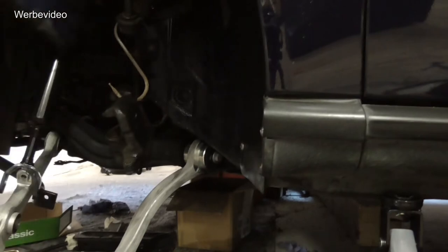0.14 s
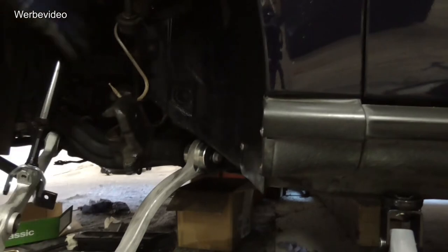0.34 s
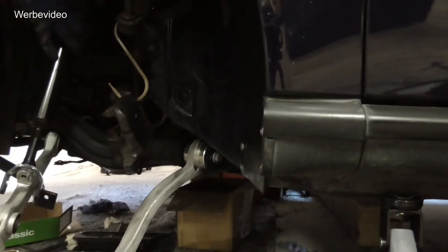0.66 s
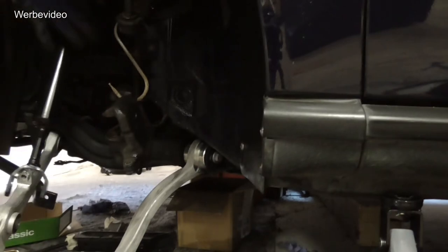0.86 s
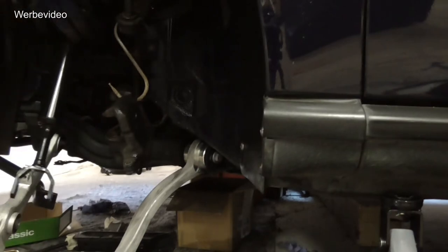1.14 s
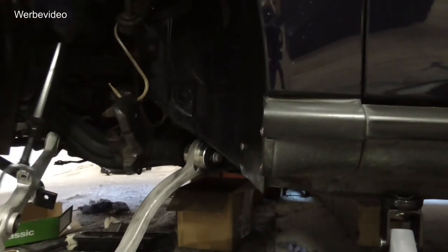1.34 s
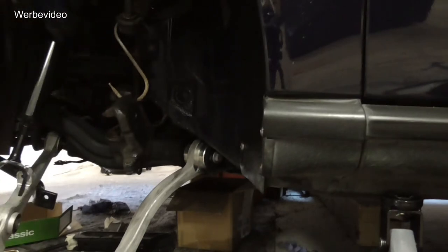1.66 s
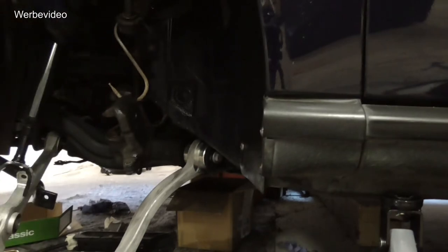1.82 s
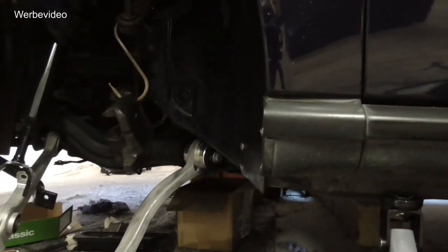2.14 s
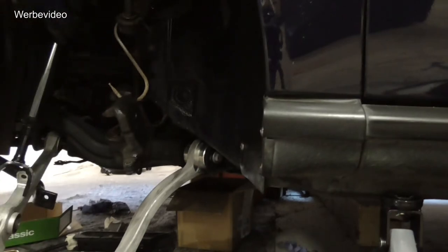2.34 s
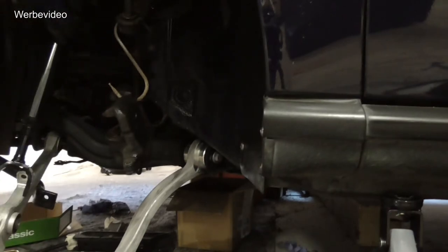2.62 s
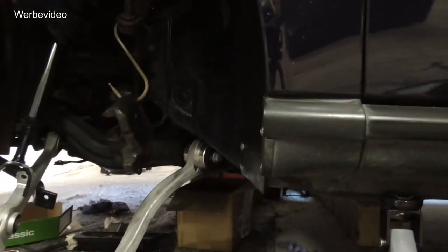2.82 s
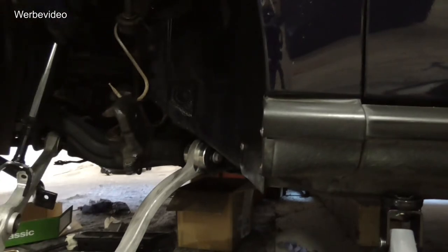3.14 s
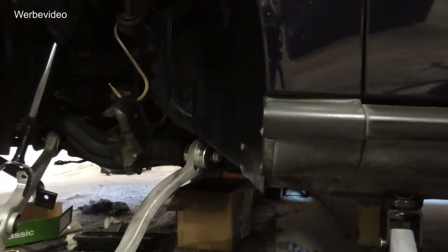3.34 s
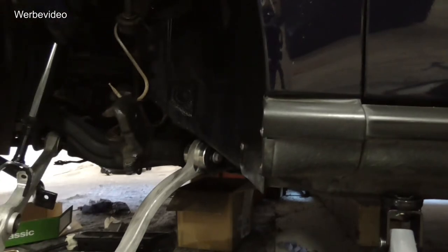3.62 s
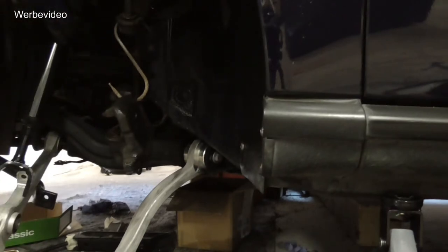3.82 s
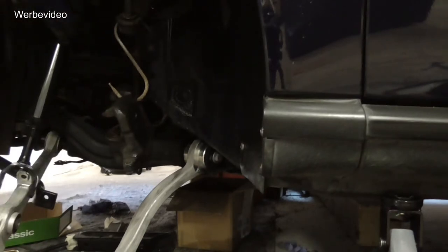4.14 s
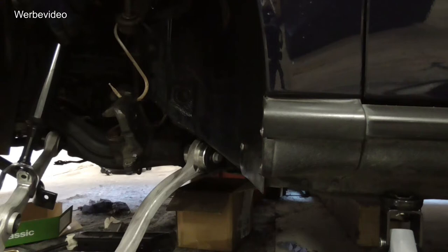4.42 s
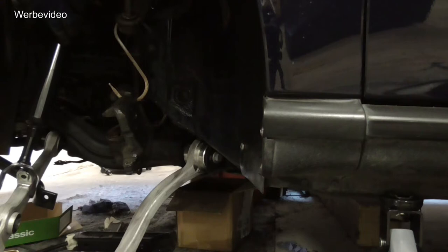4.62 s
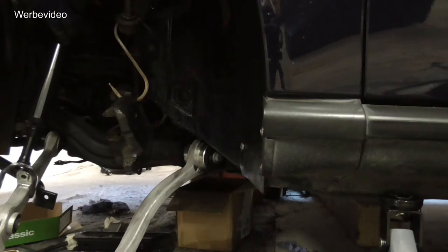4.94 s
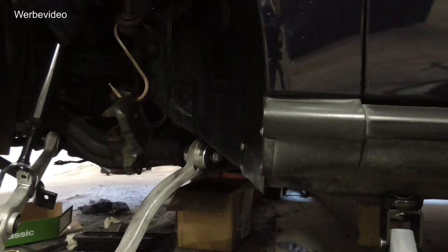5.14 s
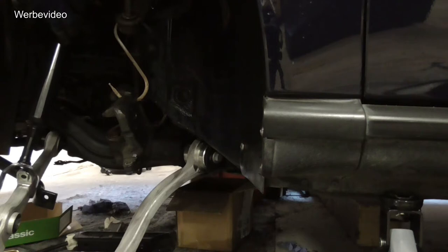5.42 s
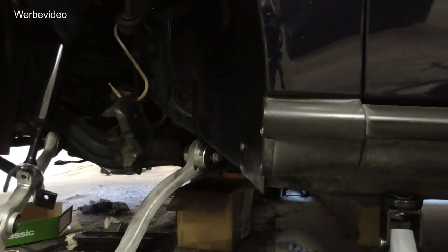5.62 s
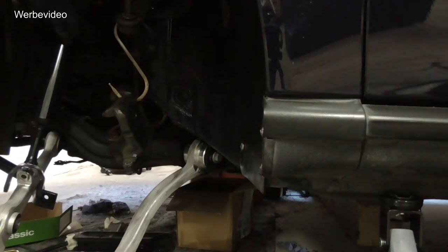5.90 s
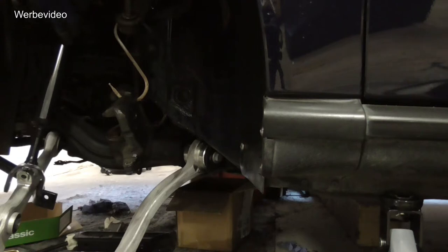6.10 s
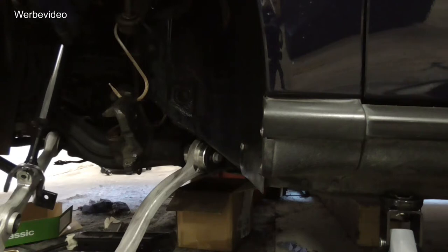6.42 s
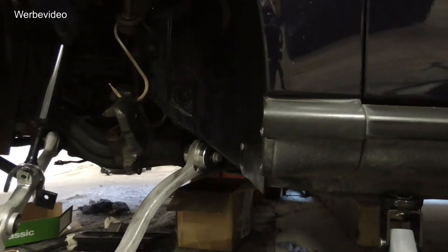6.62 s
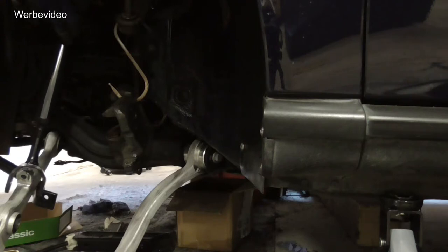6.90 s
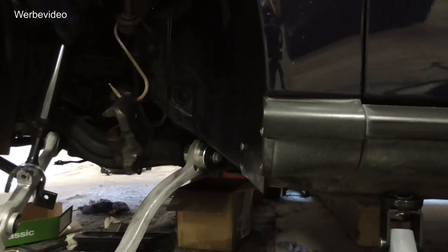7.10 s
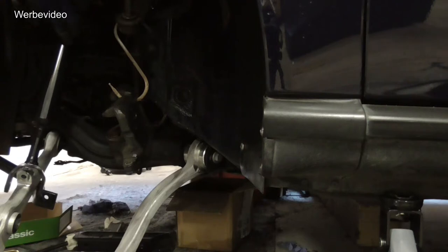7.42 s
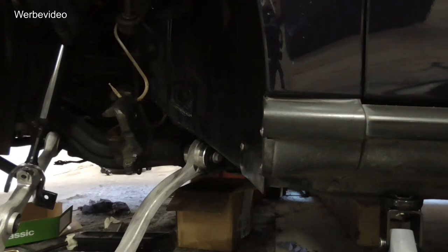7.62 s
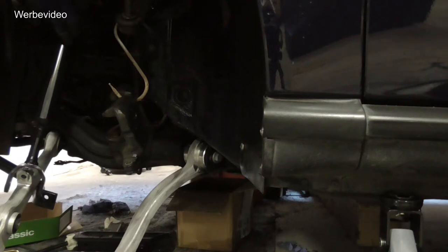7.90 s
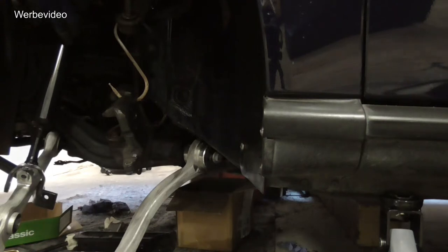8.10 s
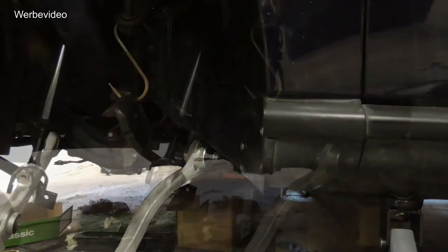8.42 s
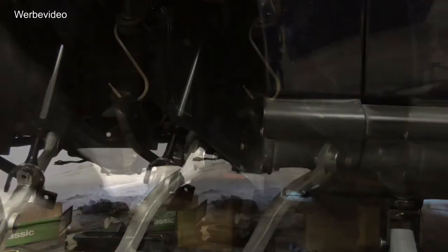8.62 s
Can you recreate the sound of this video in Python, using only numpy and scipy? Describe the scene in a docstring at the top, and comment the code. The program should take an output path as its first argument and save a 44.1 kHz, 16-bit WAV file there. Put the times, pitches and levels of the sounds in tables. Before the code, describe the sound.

Someone works on a car's suspension in a slightly echoing garage. Soft knocks build to a cluster of dull, heavy thuds, then a steel wrench and socket snap, clink and slide on a bolt. Most clacks are short and damped by the hand, though a few leave a thin high ring. Another thud and lighter clicks follow. Sleeves swish near the microphone over faint steady room noise.

```python
"""Dull knocks and rustling sleeves, then steel clacks, clinks and slides: a wrench and socket being
fitted to a bolt on a car's suspension in a garage. The heavy arm thuds against the body and hums on.
The hand damps the tools to short clacks; let go for a moment, they ring. Sliding steel catches and
slips. The work echoes in the room, the sleeves are close, and a faint steady noise lies beneath."""
import sys
import numpy as np
from scipy import signal
from scipy.fft import rfft, irfft
from scipy.io import wavfile
from scipy.ndimage import uniform_filter1d

SR = 44100
rng = np.random.default_rng(int(sys.argv[2]) if len(sys.argv) > 2 else 0)


def dump(signal):
    """Clip the signal to [-1, 1] and save it as 16-bit WAV at the path in sys.argv[1]."""
    limited = np.clip(np.atleast_2d(signal).T, -1, 1)
    pcm = np.round(limited * 32767).astype(np.int16)
    wavfile.write(sys.argv[1], SR, pcm)


N = 385875
TIME_S = np.arange(N) / SR
BIN_HZ = np.maximum(np.fft.rfftfreq(N, 1 / SR), 1)
PIVOT_HZ = 2000   # reference for tilt and damping
CONTACT_RISE_S, STEEL_SCATTER_DB = .0008, 2.5


def from_db(db):
    return 10 ** (np.asarray(db) / 20)


def unit_rms(x):
    return x / np.sqrt(np.mean(x ** 2) + 1e-20)


def at_hz(points, hz):
    """Table value on a log-frequency axis."""
    freq_hz, value = np.transpose(points)
    return np.interp(np.log(hz), np.log(freq_hz), value)


def band_centres(edges_hz):
    return np.sqrt(np.multiply(edges_hz[:-1], edges_hz[1:]))


def band_of(edges_hz, hz):
    return int(np.searchsorted(edges_hz[1:-1], hz))


def butterworth(x, kind, cutoff_hz, order=2):
    return signal.sosfilt(signal.butter(order, cutoff_hz, kind, fs=SR, output="sos"), x)


def swell(peak_s, half_s, level_db):
    return from_db(level_db) * np.exp(-((TIME_S - peak_s) / half_s) ** 2)


def smooth_noise(window_samples):
    return unit_rms(uniform_filter1d(rng.standard_normal(N), size=window_samples))


# left-right likeness: freq_hz, correlation
LIKENESS = [(100, 0.96), (500, 0.8), (1100, 0.55), (2500, 0.72), (5000, 0.78), (9000, 0.26), (14000, 0.1)]
def stereo_noise(gain):
    """Unit-rms noise with a gain per bin; the channels are less alike in the treble."""
    alike = at_hz(LIKENESS, BIN_HZ)
    mid, side = rfft(rng.standard_normal((2, N)))
    spectrum = np.sqrt(1 + alike) * mid + np.sqrt(1 - alike) * side * [[1], [-1]]
    return unit_rms(irfft(gain * spectrum, N))


def coloured_noise(colour):
    return stereo_noise(from_db(at_hz(colour, BIN_HZ)))


def resonator(drive, hz, t60_s):
    """One mode: a unit click starts a decaying sine of height 1."""
    radius, angle = from_db(-60 / (t60_s * SR)), 2 * np.pi * hz / SR
    return signal.lfilter([0, np.sin(angle)], [1, -2 * radius * np.cos(angle), radius ** 2], drive)


def blow_envelope(t, rise_s, t60_s):
    return (1 - np.exp(-t / rise_s)) * from_db(-60 * t / t60_s)


def dense_modes(times_s, bands_db, edges_hz, colour, t60s_s, rise_s):
    """Modes too dense to tell apart: each blow starts a noise burst in every band."""
    starts, rises_s = (times_s * SR).astype(int), np.broadcast_to(rise_s, len(times_s))
    out = 0
    for low_hz, high_hz, levels_db, t60_s in zip(edges_hz, edges_hz[1:], bands_db, t60s_s):
        band = 1 / np.sqrt((1 + (low_hz / BIN_HZ) ** 12) * (1 + (BIN_HZ / high_hz) ** 12))
        t, power = TIME_S[:int(min(t60_s, 1) * SR)], np.zeros(N + SR)
        for start, height, rise in zip(starts, from_db(levels_db), rises_s):
            power[start:start + len(t)] += (height * blow_envelope(t, rise, t60_s)) ** 2
        out = out + np.sqrt(power[:N]) * stereo_noise(band * from_db(at_hz(colour, BIN_HZ)))
    return out


def clear_modes(modes, times_s, force_db_at, detune, scatter_db=STEEL_SCATTER_DB, rise_s=1 / SR):
    """Decaying sines; sign, strength and pitch scatter from blow to blow."""
    starts, rises_s = (times_s * SR).astype(int), np.broadcast_to(rise_s, len(times_s))
    out = np.zeros(N + SR)
    for hz, level_db, t60_s in modes:
        t = TIME_S[:int(min(t60_s, 1) * SR)]
        polarity, strength, shift = rng.standard_normal((len(times_s), 3)).T
        heights = np.sign(polarity) * from_db(force_db_at(hz) + level_db + scatter_db * strength)
        for start, height, pitch_hz, rise in zip(starts, heights, hz * (1 + detune * shift), rises_s):
            envelope = height * blow_envelope(t, rise, t60_s)
            out[start:start + len(t)] += envelope * np.sin(2 * np.pi * pitch_hz * t)
    return out[:N]


# room noise spectrum: freq_hz, gain_db
ROOM_COLOUR = [(15, -48), (25, -20), (82, -16), (145, -11), (223, -1), (263, -8.5), (463, -8.5),
               (607, -26.5), (1130, -15.5), (1230, -27), (2550, -32), (3430, -59.5), (5570, -51),
               (9570, -31), (16000, -37.5)]
def room_noise(level_db, whirr_hz, whirr_width_hz, whirr_db):
    """Steady noise with a faint narrow whirr."""
    whirr = stereo_noise(1 / (1 + ((BIN_HZ - whirr_hz) / whirr_width_hz) ** 2))
    return from_db(level_db) * coloured_noise(ROOM_COLOUR) + from_db(whirr_db) * whirr


# reverberation time: freq_hz, t60_s
GARAGE_DECAY = [(60, 2.0), (130, 0.5), (300, 0.48), (1000, 0.53), (2800, 0.52), (7000, 0.41), (14000, 0.27)]
# reverberation spectrum: freq_hz, gain_db
GARAGE_COLOUR = [(60, 0), (200, 1.5), (500, -2), (1000, -2), (2000, -3), (4500, -10.5), (8000, -11),
                 (14000, -11)]
def garage_echo(x, rise_s):
    """Diffuse reflections build quickly and die octave by octave, the bass last."""
    noise = rfft(stereo_noise(gain=1)[:, :SR])
    hz = np.maximum(np.fft.rfftfreq(SR, 1 / SR), 1)
    response = 0
    for centre_hz in 31.25 * 2. ** np.arange(10):
        share = np.maximum(1 - np.abs(np.log2(hz / centre_hz)), 0)
        octave = irfft(noise * share * from_db(at_hz(GARAGE_COLOUR, hz)), SR)
        decay = blow_envelope(TIME_S[:SR], rise_s, at_hz(GARAGE_DECAY, centre_hz))
        response = response + octave * decay / np.sqrt(np.sum(decay ** 2))
    return signal.fftconvolve(x.mean(axis=0)[None], response, axes=1)[:, :N]


# swells of a low hum: peak_s, half_length_s, level_db
HUM_SWELLS = [(2.354, 0.15, -54.5), (7.595, 0.057, -46.5), (7.797, 0.042, -51)]
def hum(pitch_hz, waver_hz):
    """A narrow low resonance swells and fades."""
    envelope = sum(swell(*row) for row in HUM_SWELLS)
    drift_cycles = np.cumsum(waver_hz * smooth_noise(900)) / SR
    return envelope * np.sqrt(2) * np.sin(2 * np.pi * (pitch_hz * TIME_S + drift_cycles))


# cloth swish spectrum: freq_hz, gain_db
SWISH_COLOUR = [(880, -9.5), (1500, -1.5), (1690, -17.5), (2140, -5.5), (2410, -14), (4500, -7.5),
                (5940, -11.5), (10300, -7), (13100, -15.5), (16000, -30)]
# cloth rubbing spectrum: freq_hz, gain_db
RUB_COLOUR = [(35, -41), (60, -12), (156, 5), (186, -4.5), (231, 3), (280, -10), (489, -4.5), (759, -7.5),
              (1060, -10.5), (2000, -33), (2600, -49), (4400, -120)]
# sleeve movements: peak_s, half_length_s, swish_db, rub_db
SLEEVE_MOVES = [(0, 0.097, -56.5, -72), (0.379, 0.2, -51, -48), (0.83, 0.062, -56, -71),
                (1.006, 0.19, -62, -67), (1.45, 0.13, -53, -44.5), (1.808, 0.063, -56, -58),
                (1.996, 0.15, -57.5, -61), (2.286, 0.088, -60.5, -55), (4.22, 0.09, -70, -51.5),
                (4.63, 0.13, -77, -67), (5.767, 0.2, -69.5, -60), (7.046, 0.1, -93, -55),
                (7.563, 0.066, -59.5, -60), (7.874, 0.11, -66, -56.5), (8.215, 0.07, -52, -56),
                (8.374, 0.059, -52, -52.5), (8.584, 0.098, -50, -84), (8.74, 0.08, -53.5, -38.5)]
def sleeves(rest_swish_db, rest_rub_db, grain, flutter_db):
    """Moving cloth gives a fine uneven swish and a low rubbing noise."""
    swish = from_db(rest_swish_db) + sum(swell(s, half_s, db) for s, half_s, db, _ in SLEEVE_MOVES)
    rub = from_db(rest_rub_db) + sum(swell(s, half_s, db) for s, half_s, _, db in SLEEVE_MOVES)
    fibres = unit_rms(np.exp(grain * smooth_noise(60)))
    folds = from_db(flutter_db * smooth_noise(1200))
    return swish * fibres * folds * coloured_noise(SWISH_COLOUR) + rub * coloured_noise(RUB_COLOUR)


# tick band: edge_hz
TICK_EDGES_HZ = [6500, 14500]
# ticks among the rustling: start_s, level_db
TICKS = [(0.921, -36), (2.392, -46), (8.403, -48), (8.412, -37.5), (8.55, -34.5)]
def ticks():
    """Very short, thin, dry ticks."""
    times_s, level_db = np.transpose(TICKS)
    return dense_modes(times_s, [level_db], TICK_EDGES_HZ, SWISH_COLOUR, [.015], CONTACT_RISE_S)


# dull blow spectrum: freq_hz, gain_db
THUD_COLOUR = [(80, -66), (130, 5.5), (330, 6), (550, 12), (750, 4), (950, -2.5), (1600, -7.5)]
# knock bands: edge_hz
KNOCK_EDGES_HZ = [80, 280, 750, 1600]
# modes of the knock, a faint low room boom, then the arm's tones: pitch_hz, gain_db, t60_s
KNOCK_MODES = [(54, -10, .8), (126, -6, .45), (152, -1, .28), (205, -1, .22), (237, -1, .25), (255, 1, .24),
               (324, 2, .17), (374, -4, .1), (422, -1, .22), (498, 2, .13), (541, 1, .14), (647, -4, .16),
               (714, -5, .16), (764, -7, .15), (937, 5, .11)]
# blows on the arm: start_s, level_db, register_hz, rise_s, note_db
KNOCKS = [(0.312, -41, 480, 0.00033, -41.5), (0.32, -43, 157, 0.007, -30.5), (0.404, -43, 543, 0.002, -43),
          (0.482, -34, 595, 0.00083, -54), (0.522, -54, 520, .003, -55), (0.794, -34, 292, 0.00082, -43),
          (0.822, -45, 192, 0.0026, -37), (0.976, -46, 160, .003, -45), (1.069, -43, 173, 0.0011, -40.5),
          (1.285, -40, 660, 0.0014, -48), (1.367, -28, 606, 0.0025, -46), (1.377, -24.5, 204, .003, -40),
          (1.435, -43, 484, .003, -44), (1.495, -15, 292, 0.00021, -29), (1.515, -22.5, 280, 0.0011, -23),
          (1.545, -36, 540, .002, -36), (1.565, -38, 232, 0.0025, -24.5), (1.602, -31.5, 656, 0.00052, -37),
          (1.696, -26.5, 255, .0003, -30.5), (1.746, -37, 251, 0.0028, -34), (1.785, -50, 694, .003, -40.5),
          (1.86, -44, 630, 0.0029, -42), (5.602, -25.5, 353, 0.0019, -24), (5.635, -44, 418.6, 0.0038, -21),
          (5.661, -35, 205.4, 0.0035, -28), (5.715, -42, 206, 0.0063, -32),
          (6.021, -33, 380, 0.00077, -34.5), (6.068, -37.5, 373, .004, -41),
          (8.686, -37.5, 302, 0.0008, -58)]
def suspension_knocks(off_register_db):
    """The heavy arm thuds; the spot struck decides which register speaks and hums on."""
    times_s, level_db, register_hz, rise_s, note_db = np.transpose(KNOCKS)
    bands_db = [level_db - off_register_db * np.log2(hz / register_hz) ** 2
                for hz in band_centres(KNOCK_EDGES_HZ)]
    thud = dense_modes(times_s, bands_db, KNOCK_EDGES_HZ, THUD_COLOUR, [.11, .09, .08], rise_s)
    modes = clear_modes(KNOCK_MODES, times_s, lambda hz: bands_db[band_of(KNOCK_EDGES_HZ, hz)],
                        detune=.0035, scatter_db=1, rise_s=rise_s)
    note_t60_s = .15
    notes = sum(clear_modes([(hz, db, note_t60_s)], np.array([s]), lambda _: 0, detune=0, rise_s=rise)
                for s, hz, rise, db in zip(times_s, register_hz, rise_s, note_db))
    knocks = from_db(3.5) * thud + from_db(-5.5) * modes + notes
    return butterworth(knocks, "band", [120, 1400])   # keeps the thud dull, without click or deep rumble


# tool modes under the hand: pitch_hz, gain_db, t60_s
GRIPPED_MODES = [(865, 2, .05), (935, 2, .06), (1380, -4, .04), (2100, -12, .035), (2570, -9, .028),
                 (3060, -11, .028), (3420, -9, .022), (3830, -8, .028), (4420, -2, .018), (4680, -4, .014),
                 (5260, -9, .016), (10050, -6, .022)]
# socket modes: pitch_hz, gain_db, t60_s
SOCKET_MODES = [(12440, -12, .1), (12840, -4, .17), (12905, -3, .2), (12940, -2, .22), (12975, -5, .2),
                (13120, -6, .13), (13370, -13, .12)]
# sliding steel spectrum: freq_hz, gain_db
SCRAPE_COLOUR = [(50, -27), (150, -10), (300, 9), (800, 9), (1300, -10), (2000, 0.5), (3300, -8),
                 (4100, -0.5), (4500, 7), (4850, -1), (5250, 0.5), (5800, -4.5), (10000, -4), (11500, -15),
                 (13000, -11), (16000, -39)]
# steel sliding on steel: start_s, length_s, level_db
SLIDES = [(4.109, 0.075, -46), (4.141, 0.059, -43.5), (4.315, 0.03, -49), (4.506, 0.092, -50),
          (4.599, 0.092, -49.5), (4.778, 0.051, -53.5), (4.885, 0.048, -48.5), (5.238, 0.047, -53.5),
          (5.43, .03, -52.5), (5.84, 0.039, -43), (5.991, 0.059, -39), (6.851, 0.034, -49),
          (7.001, 0.026, -46), (8.449, 0.13, -50)]
def sliding_steel(slips_per_s, slip_t60_s, spread_db, squeal_db, shimmer_db):
    """Steel catches and slips; each slip is a tiny clack that stirs the tool and the socket."""
    pressure = np.zeros(N)
    for start_s, length_s, level_db in SLIDES:
        along = np.clip((TIME_S - start_s) / length_s, 0, 1)
        pressure += from_db(level_db) * np.sqrt(4 * along * (1 - along))
    slips = (rng.random(N) < slips_per_s / SR) * from_db(spread_db * rng.standard_normal(N))
    power_decay = from_db(-120 / (slip_t60_s * SR))
    slip_power = signal.lfilter([1], [1, -power_decay], slips ** 2 + 1e-18)
    scrape = unit_rms(np.sqrt(slip_power)) * coloured_noise(SCRAPE_COLOUR)
    squeal = unit_rms(sum(from_db(db) * resonator(slips, hz, t60) for hz, db, t60 in GRIPPED_MODES))
    shimmer = unit_rms(sum(from_db(db) * resonator(slips, hz, t60) for hz, db, t60 in SOCKET_MODES))
    return pressure * (scrape + from_db(squeal_db) * squeal + from_db(shimmer_db) * shimmer)


def favoured_modes(times_s, pitches_hz, levels_db, pivot_t60_s=.028, damping=.075):
    """The spot struck brings out one short mode; higher ones die sooner."""
    out = 0
    for start_s, hz, level_db in zip(times_s, pitches_hz, levels_db):
        click = np.full(N, 1e-18)
        click[round(start_s * SR)] = from_db(level_db)
        out = out + resonator(click, hz, pivot_t60_s * (PIVOT_HZ / hz) ** damping)
    return out


# steel tool spectrum: freq_hz, gain_db
STEEL_COLOUR = [(200, 2), (450, 10.5), (900, 7), (1250, 3), (1900, -3.5), (3000, -5), (3800, -0.5),
                (4600, -2), (5900, -12), (8800, -11.5), (10000, -14.5), (11500, -23.5), (13000, -21.5),
                (16000, -34)]
# free wrench modes: pitch_hz, gain_db, t60_s
WRENCH_MODES = [(1427, -3, .2), (2137, -6, .17), (3391, -14, .07), (3817, -9, .09), (8040, 1, .22),
                (8240, 2, .22), (8330, 2, .18), (10060, -8, .14)]
# socket sizzle band: edge_hz
SIZZLE_EDGES_HZ = [12200, 13800]
# hard contacts that leave a part ringing:
# start_s, snap_db, wrench_db, socket_db, sizzle_db, lower_hz, lower_db, upper_hz, upper_db
HARD_CONTACTS = [(2.723, -14.5, -74, -80, -75, 930, -25, 4490, -18),
                 (2.797, -12.5, -76, -82, -72, 2640, -36, 5030, -26),
                 (3.256, -52, -74, -50, -60, 5270, -35.5, 9900, -33),
                 (3.398, -30, -73, -52, -52, 4570, -16, 5170, -18),
                 (3.422, -39, -65, -52.5, -48, 4600, -16.5, 9800, -17.5),
                 (3.453, -13.5, -67.5, -30.5, -39, 4480, -27, 5180, -34),
                 (3.878, -33, -80, -72, -68, 3750, -42, 5350, -28),
                 (5.533, -40, -79, -63.5, -68, 3840, -19.5, 5130, -25.5),
                 (6.023, -35, -46, -66, -58, 2064, -21, 10000, -23.5),
                 (6.403, -41, -69, -47, -26, 1440, -28.5, 12900, -13.5),
                 (6.875, -57, -81, -85, -86, 910, -34, 3340, -33.5)]
def free_rings():
    """Let go for a moment, the wrench chimes and the small socket pings and sizzles."""
    (times_s, _, wrench_db, socket_db, sizzle_db,
     lower_hz, lower_db, upper_hz, upper_db) = np.transpose(HARD_CONTACTS)
    wrench = clear_modes(WRENCH_MODES, times_s, lambda _: wrench_db, detune=.0024)
    clash = favoured_modes(times_s, lower_hz, lower_db) + favoured_modes(times_s, upper_hz, upper_db)
    socket = clear_modes(SOCKET_MODES, times_s, lambda _: socket_db, detune=.00084)
    hiss = dense_modes(times_s, [sizzle_db], SIZZLE_EDGES_HZ, STEEL_COLOUR, [.2], CONTACT_RISE_S)
    sizzle = butterworth(hiss, "band", SIZZLE_EDGES_HZ)
    pan_right = from_db([[-1], [1]])
    return wrench + clash + (socket + sizzle) * pan_right


# snap band: edge_hz
SNAP_EDGES_HZ = [900, 16000]
# snap spectrum: freq_hz, gain_db
SNAP_COLOUR = [(900, -8), (5000, 13), (8000, -5.5), (16000, -13)]
def snaps(t60_s):
    """Hardened steel meeting squarely gives a brief bright crack."""
    times_s, snap_db = np.transpose(HARD_CONTACTS)[:2]
    return dense_modes(times_s, [snap_db], SNAP_EDGES_HZ, SNAP_COLOUR, [t60_s], CONTACT_RISE_S)


# spells of soft rattling: start_s, end_s, mean_db
RATTLES = [(3.079, 3.331, -43), (3.465, 3.62, -46), (3.664, 4.091, -50), (4.102, 4.42, -51.5),
           (4.529, 4.945, -51.5), (5.108, 5.5, -52.5), (6.906, 7.094, -62)]
def light_taps(gap_s, jitter_s, spread_db, tilt_db_per_octave, limit_hz):
    """The tools rattle as the fingers feel for the bolt; returns rows like CONTACTS."""
    taps = [(s, db) for start_s, end_s, db in RATTLES for s in np.arange(start_s, end_s, gap_s)]
    draws = rng.standard_normal((len(taps), 2))
    return [(s + jitter_s * late, db + spread_db * force, tilt_db_per_octave, limit_hz)
            for (s, db), (late, force) in zip(taps, draws)]


# clack bands: edge_hz
CLACK_EDGES_HZ = [130, 550, 1600, 6000, 11500, 16000]
# steel on steel; light parts tilt the spectrum up, heavy ones down, hard contacts keep more treble:
# start_s, level_db, tilt_db_per_octave, limit_hz
CONTACTS = [(1.438, -43.5, 7.5, 6100), (1.496, -35, 5, 5400), (1.631, -53.5, 6.5, 15300),
            (1.697, -46, 9.5, 2980), (1.861, -48, -2, 11800), (2.719, -22.5, 6, 1900),
            (2.723, -22, 4, 4660), (2.797, -24, 3.5, 5640), (3.076, -43, 3.5, 2490),
            (3.171, -23, 7.5, 2500), (3.256, -38, 0.5, 10000), (3.383, -30.5, 6, 7600),
            (3.397, -29.5, 6, 7900), (3.413, -28.5, 1.5, 6100), (3.423, -30.5, 9, 7400),
            (3.452, -28.5, 1, 16000), (3.678, -40, 3.5, 1700), (3.713, -38, 5.5, 1600),
            (3.789, -42.5, -0.5, 7240), (3.873, -44.5, 3.5, 7000), (3.876, -40, 2.5, 8000),
            (4.041, -54.5, 2.5, 11920), (4.249, -36, 4.5, 1407), (4.263, -37.5, 5, 1510),
            (4.321, -43, -2, 4130), (4.518, -41.5, 1, 5200), (4.557, -42.5, -1, 5430),
            (4.593, -37, 3, 3800), (4.607, -33.5, 4, 6340), (4.636, -44.5, -2.5, 11000),
            (4.781, -56.5, -3.5, 5000), (4.839, -49.5, -2.5, 1692), (4.891, -57, -5.5, 15900),
            (4.907, -55, -4.5, 5000), (5.511, -45.5, 0, 2800), (5.534, -30.5, 5.5, 7300),
            (5.834, -48, -2.5, 9000), (5.862, -37, -1, 7500), (6.013, -31, 7.5, 6200),
            (6.023, -26.5, 5, 6800), (6.374, -41.5, -2, 20200), (6.403, -29.5, 2, 20000),
            (6.823, -49, -0.5, 2340), (6.864, -40, -0.5, 8000), (6.874, -34, 2, 4300),
            (7.008, -36.5, -1, 7060), (7.022, -57, 6, 12000), (7.046, -48.5, 0, 11800),
            (7.078, -56, 3, 9000), (7.319, -42, 1.5, 2500), (7.336, -42.5, 4.5, 2820),
            (7.356, -45, -2, 4200), (7.378, -52.5, 0, 3200), (8.192, -38, 2, 7200)]
def tool_contacts(loose_from_s, loose_until_s, ping_db):
    """The hand damps the steel to short clacks and tones; the socket pings while it sits loose."""
    taps = light_taps(gap_s=.036, jitter_s=.011, spread_db=2.5, tilt_db_per_octave=2, limit_hz=1500)
    times_s, level_db, tilt_db_per_octave, limit_hz = np.transpose(list(CONTACTS) + taps)
    bands_db = []
    for hz in band_centres(CLACK_EDGES_HZ):
        treble_loss_db = 20 * np.log10(1 + (hz / limit_hz) ** 4)
        bands_db.append(level_db + tilt_db_per_octave * np.log2(hz / PIVOT_HZ) - treble_loss_db)
    clacks = dense_modes(times_s, bands_db, CLACK_EDGES_HZ, STEEL_COLOUR,
                         t60s_s=[.071, .12, .043, .055, .042], rise_s=.0014)   # chatter slows the rise
    tones = clear_modes(GRIPPED_MODES, times_s, lambda hz: bands_db[band_of(CLACK_EDGES_HZ, hz)],
                        detune=.015)
    loose_s = np.array([s for s, *_ in CONTACTS if loose_from_s < s < loose_until_s])
    pings = clear_modes(SOCKET_MODES, loose_s, lambda _: ping_db, detune=.002)
    return from_db(.5) * clacks, from_db(-1.5) * tones + pings


def delay_right(x, lag_s):
    return irfft(rfft(x) * np.exp(-2j * np.pi * BIN_HZ * [[0], [lag_s]]), N)


def scene():
    """The work on the car, its echo, the close sounds and the room."""
    clacks, tones = tool_contacts(loose_from_s=3.3, loose_until_s=5.5, ping_db=-69)
    steel = clacks + snaps(t60_s=.014)
    steel += sliding_steel(slips_per_s=120, slip_t60_s=.06, spread_db=3, squeal_db=-4, shimmer_db=-19)
    rings = butterworth(tones + free_rings(), "high", 420)   # the rings carry no bass or low thump
    knocks = suspension_knocks(off_register_db=4.5)
    close = sleeves(rest_swish_db=-67, rest_rub_db=-62.5, grain=.28, flutter_db=1)
    close += ticks() + hum(pitch_hz=218, waver_hz=3.6)
    direct = delay_right(steel + rings + knocks, lag_s=12e-6)
    echo = garage_echo(steel + from_db(-14) * rings + from_db(-3) * knocks, rise_s=.0089)
    room = room_noise(level_db=-57, whirr_hz=1165, whirr_width_hz=23, whirr_db=-67.5)
    return direct + echo + close + room


def record(dry):
    """The microphone loses the deep bass; the top is cut steeply."""
    thin = butterworth(dry, "high", 55, order=3)
    return signal.sosfilt(signal.ellip(10, .2, 80, 15900, fs=SR, output="sos"), thin)


dry = scene()
out = record(dry)
dump(out)
```